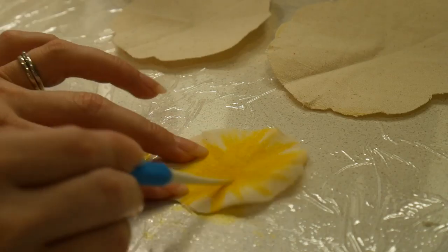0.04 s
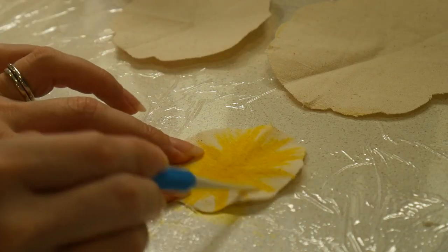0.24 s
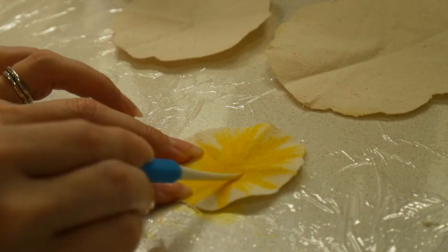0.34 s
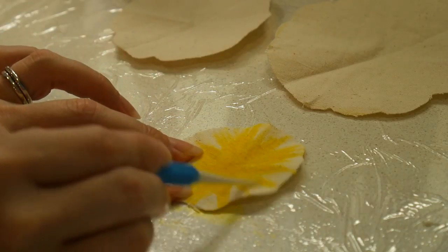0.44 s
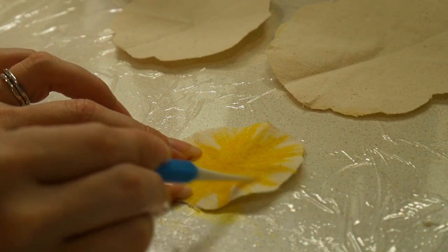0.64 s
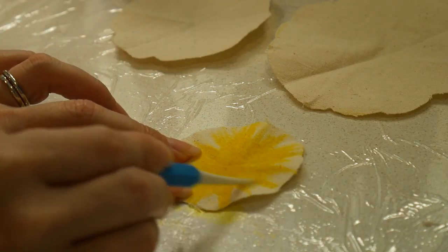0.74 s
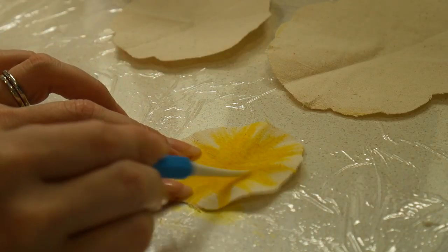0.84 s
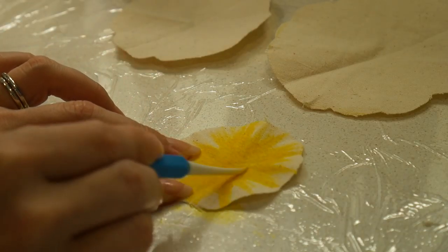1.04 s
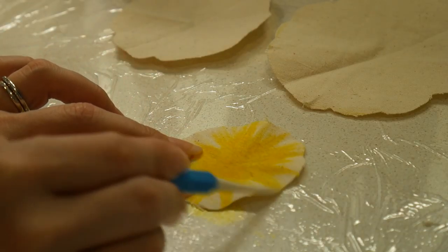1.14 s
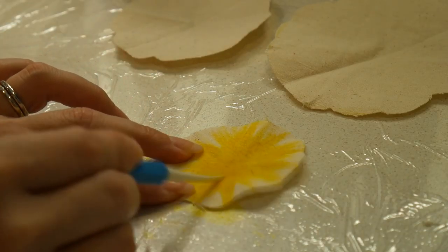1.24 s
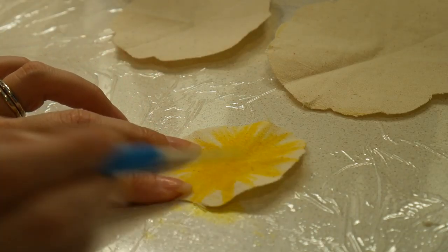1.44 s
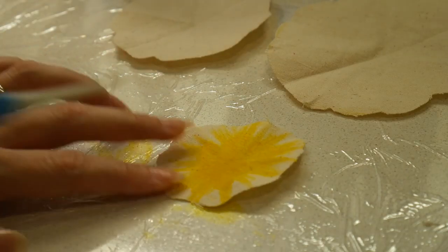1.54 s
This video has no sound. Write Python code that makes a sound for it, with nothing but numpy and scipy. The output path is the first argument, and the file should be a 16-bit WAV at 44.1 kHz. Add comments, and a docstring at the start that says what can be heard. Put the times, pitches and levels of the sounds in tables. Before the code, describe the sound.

Small stiff brush scrubs damp fabric in seven quick scratchy strokes, close up in a quiet room

```python
"""A low hum and faint room noise run throughout; ticks, bumps and rubs of fingers and handle come first.
A small plastic brush then scrubs dye into damp fabric on a covered counter, in seven quick strokes.
A dull tip tap precedes each of the first five; in all seven a catch snap and dense random snaps,
filtered by resonances of tool and counter, swell and fade over a soft counter rumble.
More finger sounds fall among and after the strokes; noise echoes give the small room."""
import sys
import numpy as np
from scipy import signal
from scipy.fft import rfft, irfft
from scipy.io import wavfile
from scipy.ndimage import uniform_filter1d

SR = 44100
rng = np.random.default_rng(int(sys.argv[2]) if len(sys.argv) > 2 else 0)


def store_wav(level_fs):
    """Save 16-bit WAV to argv[1]."""
    pcm = np.round(np.clip(np.atleast_2d(level_fs), -1, 1) * 32767)
    wavfile.write(sys.argv[1], SR, pcm.T.astype(np.int16))


N = 70560
T = np.arange(N) / SR
HZ = np.maximum(np.arange(N + 1) * SR / (2 * N), 1)
TREBLE_HZ = 4660

# brush strokes: start_s, swell_s, hold_s, lift_off_s, level_db, treble_db, knock_db, ring_hz, ring_db
BRUSH_STROKES = [(0.234, 0.0079, 0.0083, 0.071, -33, -4, 1.5, 2030, 9.5),
                 (0.4386, 0.015, 0.0083, 0.049, -28, -2, -6, 1210, 2),
                 (0.615, 0.0016, 0.031, 0.054, -30.5, 3.5, 9.5, 1100, 3),
                 (0.8091, 0.0069, 0.0062, 0.055, -28, 1.5, -4, 1587, 3),
                 (0.9897, 0.00097, 0.015, 0.056, -28.5, 5, 9, 1290, 7),
                 (1.168, 0.0022, 0.0055, 0.06, -25, 4.5, 8, 1600, 4),
                 (1.3554, 0.014, 0.0067, 0.033, -30, 0, -4.5, 1169, 5)]


def from_db(db):
    """Decibels to gain."""
    return 10 ** (np.asarray(db) / 20)


def rms_one(x):
    """Scale to rms 1."""
    return x / np.sqrt(np.mean(x ** 2) + 1e-20)


def curve(points):
    """Interpolate (Hz, dB) points over log frequency."""
    hz, db = np.transpose(points)
    return np.interp(np.log(HZ), np.log(hz), db)


def bump(hz, width_hz):
    """Power response of a resonance, 1 on top."""
    return 1 / (1 + ((HZ ** 2 - hz ** 2) / (HZ * width_hz)) ** 2)


def treble():
    """Soft shelf from 0 in the bass to 1 in the treble."""
    return 1 / (1 + (TREBLE_HZ / HZ) ** 4)


def colour(x, db):
    """Causal minimum-phase filter that keeps the power of white noise."""
    cepstrum = irfft(np.log(rms_one(from_db(db)) + 1e-9))
    # fold the cepstrum onto positive time: minimum phase
    cepstrum[1:N] *= 2
    cepstrum[N + 1:] = 0
    response = np.exp(rfft(cepstrum))
    return irfft(rfft(x, 2 * N) * response)[..., :N]


def band(x, hz, width_hz):
    """Band-pass with the steep sides of a resonance applied twice."""
    return colour(x, 20 * np.log10(bump(hz, width_hz)))


def click(s):
    """One-sample unit click."""
    return 1. * (np.arange(N) == int(s * SR))


def swell_shape(middle_s, half_s):
    """Gaussian rise and fall, 1/e at half_s from the middle."""
    return np.exp(-((T - middle_s) / half_s) ** 2)


def dying_noise(s, t60_s):
    """Unit-energy noise that starts at s and decays 60 dB in t60_s."""
    decay = from_db(-60 * np.maximum(T - s, 0) / t60_s)
    return rms_one(rng.standard_normal(N) * (T >= s) * decay) / np.sqrt(N)


def stereo(mid, side):
    """Left and right from mid and side."""
    return np.array([mid + side, mid - side])


def resonances_db():
    """Narrow resonant peaks of tool and counter."""
    # pitch_hz, width_hz, lift_db
    peaks = [(1070, 85, 6.5), (1240, 28, 8.5), (1473, 116, 6), (2027, 150, 7), (2337, 32, 11),
             (2655, 80, 6.5), (2833, 195, 8.5), (3535, 81, 9), (5032, 73, 7.5), (6253, 61, 11.5),
             (6442, 84, 10.5), (6730, 90, 6.5), (7150, 214, 9), (8700, 120, 3.5), (9810, 214, 8),
             (11870, 39, 9.5)]
    return sum(db * bump(hz, width_hz) for hz, width_hz, db in peaks)


def body_db():
    """Snap spectrum plus the resonances of tool and counter."""
    # bristle snap spectrum: frequency_hz, density_db (relative)
    snap = [(100, -25), (300, -24), (500, -14), (680, -10.5), (820, -3.5), (1300, -1.5), (1620, 2),
            (1800, -5.5), (2500, -1), (3150, -8.5), (3800, -2), (5500, -10), (6600, -3.5), (7900, -11.5),
            (8600, -6.5), (10700, -9), (12200, -8.5), (13800, -21.5), (15000, -18.5), (16000, -88)]
    return curve(snap) + resonances_db()


def background():
    """Diffuse room noise, independent left and right, with a faint sine hum."""
    # quiet room spectrum: frequency_hz, density_db (relative)
    floor = [(25, -26), (60, -11), (90, -12), (120, -3), (170, 0.5), (240, -6), (310, 0.5), (450, -4.5),
             (700, 0), (1200, -7.5), (2500, -12), (5000, -16.5), (10000, -15.5), (15000, -23), (16000, -42)]
    floor_db, hum_hz, hum_db = -59, 117, -79
    air = colour(rng.standard_normal((2, N)), curve(floor))
    hum = np.sqrt(2) * np.sin(2 * np.pi * hum_hz * T)
    return from_db(floor_db) * air + from_db(hum_db) * hum


def ticks():
    """Handle and wet cover tick: decaying noise in a band, each at its own pitch."""
    # start_s, level_db, pitch_hz, width_hz, t60_s
    tick_table = [(.041, -31.5, 790, 1380, 0.018), (.128, -25.5, 9400, 7300, 0.0093),
                  (.136, -37, 10400, 3870, .012), (0.795, -32, 8500, 7000, .004),
                  (1.5633, -24, 2200, 376, 0.02), (1.5625, -30.5, 3600, 700, 0.032)]
    return sum(from_db(db) * band(dying_noise(s, t60_s), hz, width_hz)
               for s, db, hz, width_hz, t60_s in tick_table)


def bumps():
    """Fingers bump softly on the counter: band noise in short swells."""
    # middle_s, half_length_s, level_db, pitch_hz, width_hz
    bump_table = [(.052, 0.017, -59.5, 600, 1000), (.058, 0.022, -59, 160, 90),
                  (0.135, 0.037, -62, 140, 197), (0.291, 0.021, -56, 332, 400),
                  (0.466, 0.021, -63.5, 149, 200), (1.031, 0.035, -58, 145, 111),
                  (1.332, 0.0065, -58.5, 290, 710)]
    out = 0
    for middle_s, half_s, db, hz, width_hz in bump_table:
        push = rng.standard_normal((2, N)) * swell_shape(middle_s, half_s)
        out = out + from_db(db) * band(push, hz, width_hz)
    return out


def bristles():
    """Stick-slip: random snaps of uneven size over fine friction hiss, steady in level."""
    snaps_per_s, spread_db, hiss_db = 2600, 2, -7.5
    lift_db = spread_db * np.minimum(rng.exponential(1, N), 4)
    sizes = from_db(lift_db) * rng.choice([-1, 1], N)
    snaps = rms_one(sizes * (rng.random(N) < snaps_per_s / SR))
    x = snaps + from_db(hiss_db) * rng.standard_normal(N)
    return x / np.sqrt(uniform_filter1d(x ** 2, size=500) + 1e-9)  # size in samples


def rubs(body):
    """Fingers and tip rub lightly: faint swells of bristle friction."""
    # middle_s, half_length_s, level_db, treble_db, hollow_db (lift of the counter's hollow tone)
    rub_table = [(0.059, 0.012, -62.5, 2, -2.5), (0.42, 0.0083, -66, -11, 3), (0.936, 0.0075, -56.5, -3, 3),
                 (1.116, 0.0098, -48.5, 4, 13), (1.405, 0.0048, -96, 1.5, 5), (1.496, 0.0087, -63, 7, 6)]
    hollow_hz, hollow_width_hz = 1290, 350
    out = 0
    for middle_s, half_s, db, treble_db, hollow_db in rub_table:
        force = bristles() * swell_shape(middle_s, half_s)
        spot = treble_db * treble() + hollow_db * bump(hollow_hz, hollow_width_hz)
        out = out + from_db(db) * colour(force, body + spot)
    return out


def thuds():
    """Counter rumbles softly under each push: low band noise in swells."""
    level_db, pitch_hz, width_hz, half_s = -62.5, 160, 62, 0.055
    push = sum(swell_shape(s + swell_s + hold_s, half_s)
               for s, swell_s, hold_s, *_ in BRUSH_STROKES)
    return from_db(level_db) * band(rng.standard_normal((2, N)) * push, pitch_hz, width_hz)


def touches(body):
    """Tip touches down just ahead of a stroke: click through the body, treble rolled off."""
    # start_s, level_db
    touch_table = [(0.228, -21.5), (0.4366, -18.5), (0.6107, -23.5), (0.802, -18), (0.9829, -15)]
    dull_hz = 3300
    taps = sum(from_db(db) * click(s) for s, db in touch_table)
    return colour(taps, body - 10 * np.log10(1 + (HZ / dull_hz) ** 2))


def strokes(body):
    """Bristles catch with a snap; pressure swells, holds and fades as the brush lifts."""
    catch_db = 8  # first snap over the stroke's level
    first_grip = 0.43  # starting share of full pressure
    lift_power = 1.61
    knock_hz, knock_width_hz, ring_width_hz = 816, 78, 107
    out = 0
    for s, swell_s, hold_s, lift_s, db, treble_db, knock_db, ring_hz, ring_db in BRUSH_STROKES:
        t = T - s
        grip = (t >= 0) * np.interp(t, [0, swell_s], [first_grip, 1])
        release = np.clip(1 - (t - swell_s - hold_s) / lift_s, 0, 1) ** lift_power
        force = grip * release * bristles() + from_db(catch_db) * click(s)
        knock = knock_db * bump(knock_hz, knock_width_hz)
        ring = ring_db * bump(ring_hz, ring_width_hz)
        spot = treble_db * treble() + knock + ring
        out = out + from_db(db) * space(colour(force, body + spot))
    return out


def room_tail():
    """Diffuse noise tail whose treble dies first."""
    delay_s, t60_s, treble_t60_s = 0.0094, 0.56, 0.27
    low = signal.butter(2, TREBLE_HZ, "low", fs=SR, output="sos")
    high = signal.butter(2, TREBLE_HZ, "high", fs=SR, output="sos")
    bass_tail = signal.sosfilt(low, dying_noise(delay_s, t60_s))
    return bass_tail + signal.sosfilt(high, dying_noise(delay_s, treble_t60_s))


def space(x):
    """Direct sound, scatter off counter and hands, smoother room tail; new echoes on each call."""
    near_db, near_t60_s, near_width = -7.5, 0.053, 0.82
    near_delay_s, near_side_delay_s = .0007, .0002
    room_db, room_width = -12, 0.48
    evening = 0.45  # share of the resonances that evens out over all directions
    near_mid = dying_noise(near_delay_s, near_t60_s)
    near_side = near_width * dying_noise(near_side_delay_s, near_t60_s)
    near = stereo(near_mid, near_side)
    far = colour(stereo(room_tail(), room_width * room_tail()), -evening * resonances_db())
    echoes = from_db(near_db) * near + from_db(room_db) * far
    return x + signal.fftconvolve(x[None], echoes)[:, :N]


def scene():
    """Everything at the counter, heard in the room."""
    body = body_db()
    small_contacts = space(ticks() + rubs(body) + touches(body))
    return background() + small_contacts + bumps() + thuds() + strokes(body)


def record(dry):
    """Microphone's stereo width and balance by frequency, then a steep top cut."""
    # frequency_hz, side_gain_db
    width_table = [(100, 0.5), (300, 5.5), (700, 2), (1500, -2), (3200, -1), (4400, -8), (6000, -8.5),
                   (7000, -17), (7800, -8), (9000, -5), (12000, -0.5)]
    # frequency_hz, left_minus_right_db
    balance_table = [(500, -0.9), (1200, -1.7), (4000, -0.1), (12000, 0.5)]
    cutoff_hz = 16150
    left, right = rfft(dry, 2 * N)
    side = (left - right) / 2 * from_db(curve(width_table))
    ports = stereo((left + right) / 2, side)
    balance = from_db(stereo(0, curve(balance_table) / 2))
    heard = irfft(ports * balance)[:, :N]
    top_cut = signal.cheby2(16, 60, cutoff_hz, fs=SR, output="sos")
    return signal.sosfilt(top_cut, heard)


dry = scene()
out = record(dry)
store_wav(out)
```